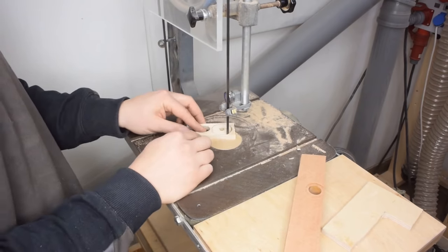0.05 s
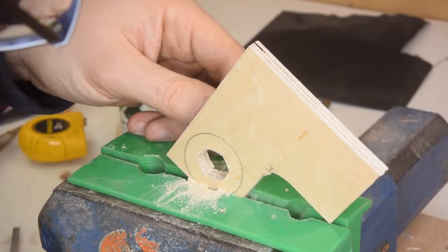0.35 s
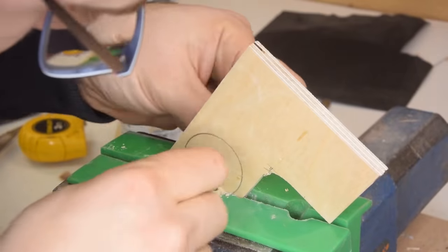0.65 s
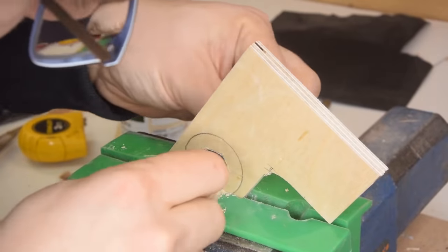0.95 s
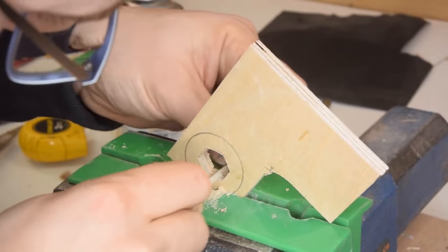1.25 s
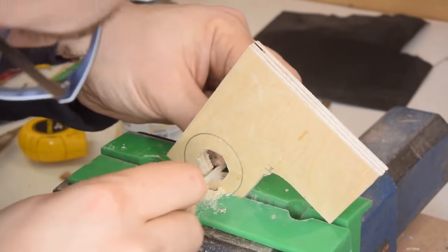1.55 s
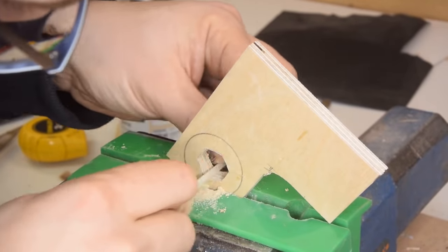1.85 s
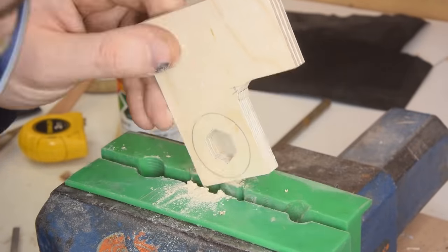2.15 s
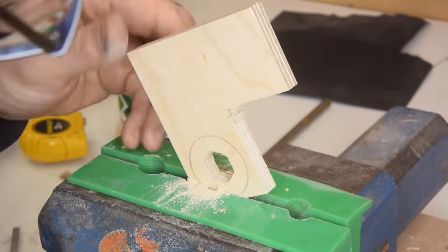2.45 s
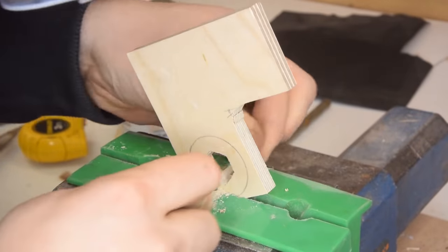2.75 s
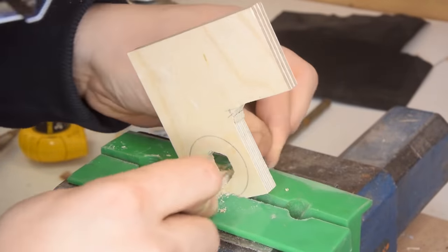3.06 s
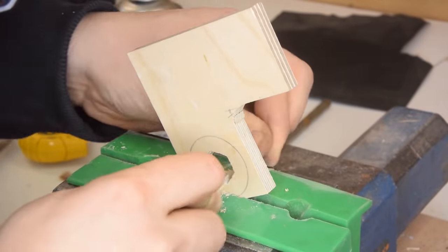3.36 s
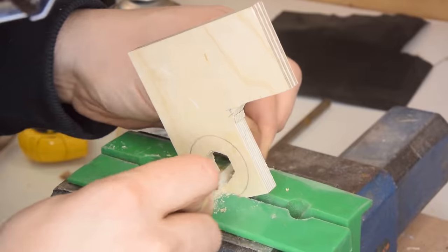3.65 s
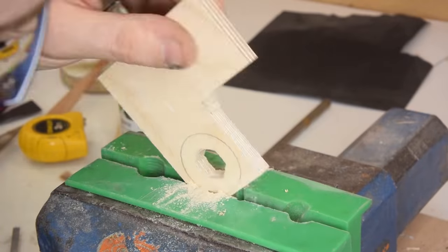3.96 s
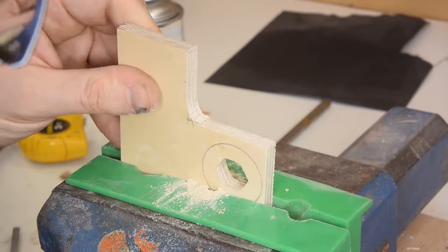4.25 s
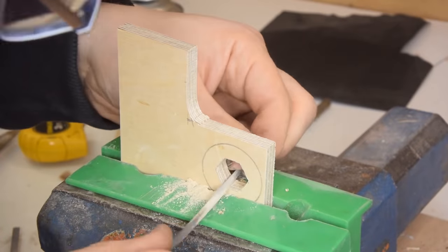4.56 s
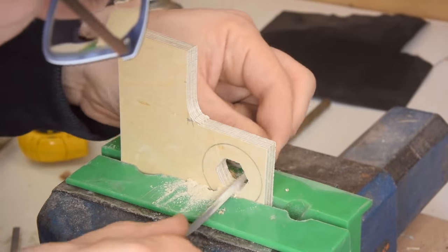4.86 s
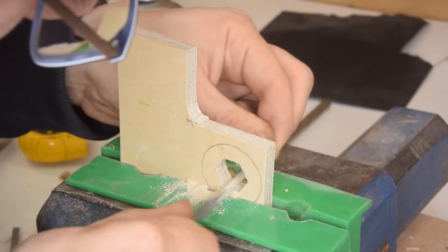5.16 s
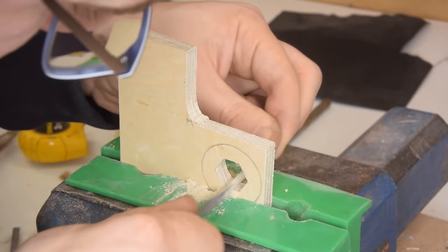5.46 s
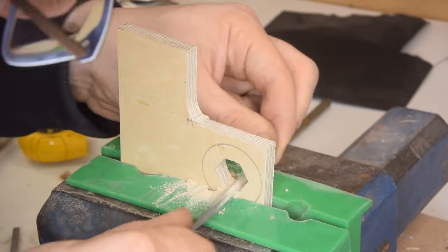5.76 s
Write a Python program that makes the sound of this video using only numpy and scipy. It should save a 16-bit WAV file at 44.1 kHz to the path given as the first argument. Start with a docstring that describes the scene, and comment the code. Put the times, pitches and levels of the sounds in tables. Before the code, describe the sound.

A bandsaw cuts plywood with a bright, gritty buzz and three tiny squeals, breaking off within half a second. Much more quietly, a small file rasps to and fro in the wood, so fast that it sounds sped up. The filing comes in three bursts, separated by woody knocks and faint hand rustles as the piece is turned and clamped in a vise. It all sounds close, over faint workshop hiss.

```python
"""Bandsaw cut, then filing at a vise.

A bandsaw cuts plywood; three times the blade slips in the kerf, squeals and sprays chips. Abrupt stop.
Then, in fast motion, a small file rasps evenly to and fro in a hole of the piece, held in a vise.
Twice the piece is turned and reclamped with woody knocks; each grip makes it ring at other pitches."""
import sys
import numpy as np
from scipy import signal
from scipy.fft import rfft, irfft
from scipy.io import wavfile

SR = 44100
rng = np.random.default_rng(int(sys.argv[2]) if len(sys.argv) > 2 else 0)


def generate_wav(sig):
    """Save sig (samples, or channels by samples) to the path in sys.argv[1] as 16-bit PCM at SR."""
    pcm = np.round(np.clip(np.atleast_2d(sig).T, -1, 1) * 32767).astype(np.int16)
    wavfile.write(sys.argv[1], SR, pcm)


N = 260631
TIME = np.arange(N) / SR

# saw teeth in wood: f/Hz, density/dB
CUT_SPECTRUM = [(60, -30), (240, -42), (450, -20), (850, -19), (1200, -8.5), (1750, -3), (2350, -11),
                (2700, -1), (6200, -3), (8000, -13), (16000, -35)]
# blade and guide resonances: f/Hz, width/Hz, boost/dB
SAW_MODES = [(2680, 265, 5.5), (3400, 67, 9.5), (4480, 90, -19.5), (5780, 257, 6.5), (7350, 150, 12.5),
             (10460, 320, 17.5)]
# chip spray: f/Hz, density/dB
CHIP_SPECTRUM = [(300, -36.5), (2000, -13.5), (5000, 4.5), (9000, 8.5), (12000, 6), (13200, 5.5),
                 (16000, 5)]
# drive hum: harmonic, level/dB
HUM_PARTIALS = [(3, -96.5), (4, -82.5), (5, -79), (6, -76), (7, -85), (8, -90), (9, -84.5), (10, -88.5),
                (12, -73.5), (14, -87), (16, -71), (17, -77)]
# running blade: f/Hz, relative level/dB, share of swell followed
BLADE_TONES = [(1771, -69, .2), (2186, -71, .2), (2693, -63, .6), (2966, -53, .4), (3319, -60, .8),
               (3459, -63, .6), (4203, -66, .3), (4474, -61, .1), (4888, -64, .4), (5583, -55, 1),
               (5716, -61, 1), (5947, -66, .6), (6634, -68, .3)]
# blade slips: t/s, load loss/dB, squeal/dB, chips/dB, decay/s
SLIPS = [(0.045, 11, -39.5, -46, 0.019), (0.113, 10, -43.5, -47.5, 0.037), (0.251, 8, -44, -42.5, 0.026)]
# slipping blade: harmonic, relative level/dB
SQUEAL_PARTIALS = [(1, -3), (2, -2.5), (3, 1)]
# pinched blade: harmonic, level/dB
WHISTLE_PARTIALS = [(1, -46.5), (2, -45.5), (3, -59.5)]
# stereo width of the saw: f/Hz, side over mid/dB
SAW_SIDE = [(2900, -61.5), (3500, -54.5), (4200, -15.5), (8000, -10.5), (15000, -5)]

# file teeth on wood: f/Hz, density/dB
RASP_SPECTRUM = [(30, -15.5), (120, -17.5), (168, 2.5), (225, -4.5), (420, 3.5), (1000, 1.5), (2000, 0.5),
                 (4000, -4), (6500, -5), (8800, -7), (9500, -14), (9950, -31), (10900, -22), (11600, -60)]
# resonances of the piece in each grip: f/Hz, width/Hz, boost/dB
GRIP_LEANING = [(1698, 140, 20), (2290, 600, 8), (3720, 450, 11.5), (5050, 360, 14), (7450, 485, 15)]
GRIP_TILTED = [(1577, 138, 17.6), (2654, 83, 20.7), (3070, 450, 11.2), (3760, 360, 13.2), (5320, 470, 7.7),
               (7660, 160, 10.8)]
GRIP_UPRIGHT = [(1120, 195, 8.5), (2187, 66, 20.7), (2480, 210, 11), (4350, 300, 8.4), (7700, 1000, 3)]
GRIP_SHIFTED = [(1130, 210, 7.8), (2185, 64, 19.2), (2490, 150, 9.1), (4420, 170, 15.9), (7600, 550, 5)]
# stroke runs: start/s, end/s, cycle rate/Hz, pressure/dB, drift/(dB/s), easing at ends/dB,
# pull over push/dB, pull cutoff/Hz, grip
FILE_RUNS = [(0.667, 1.387, 19.33, -53, 2, 5.5, -1, 5100, GRIP_LEANING),
             (1.387, 1.975, 19.56, -52.6, 1, 0.5, -1, 5100, GRIP_LEANING),
             (2.757, 3.757, 19.6, -52.7, -2.6, 0.3, -2, 9050, GRIP_TILTED),
             (4.654, 4.791, 18.1, -56.8, -4, 0.6, -1.5, 9000, GRIP_UPRIGHT),
             (4.894, 5.298, 19.66, -55.8, -7, 2.5, -1, 13900, GRIP_UPRIGHT),
             (5.298, 5.93, 19.83, -58.8, 0.8, 3.5, 2, 13000, GRIP_SHIFTED)]
# resonances of the hole's rim: f/Hz, width/Hz, boost/dB
RIM_MODES = [(1960, 630, 13.5), (4100, 1600, 12.5), (7400, 750, 10.5)]
# single scrapes: centre t/s, length/s, level/dB
SCRAPES = [(0.623, 0.028, -74), (0.665, 0.016, -56.5), (2.005, 0.017, -50.5), (2.426, 0.028, -56.5),
           (2.563, 0.017, -67), (2.717, 0.038, -71), (2.769, 0.024, -54.5), (3.774, 0.03, -65),
           (3.793, 0.034, -59), (3.847, 0.05, -51.5), (4.805, 0.037, -70), (4.88, 0.016, -66)]

# knocks of wood, file and vise: t/s, relative level/dB, low cut/Hz, high cut/Hz, chatter/s, note/Hz
KNOCKS = [(0.534, -70.5, 910, 2520, 0.0042, 1690), (0.751, -56, 295, 970, 0.0071, 755),
          (1.318, -54, 300, 1000, 0.0055, 800), (1.722, -55, 300, 1000, 0.0031, 1000),
          (1.986, -52.5, 500, 1000, 0.0041, 880), (2.125, -72, 150, 500, .003, 259),
          (2.293, -54, 450, 3000, 0.0034, 2140), (2.399, -39.5, 260, 685, 0.007, 593),
          (2.417, -39, 220, 850, 0.0075, 620), (2.461, -35, 240, 2920, 0.011, 1383),
          (2.630, -64.5, 1210, 2500, 0.0034, 1790), (3.655, -51, 508, 1120, 0.0061, 894),
          (4.086, -51.5, 300, 3030, 0.0031, 1050), (4.140, -55, 305, 2020, 0.0065, 740),
          (4.242, -42.5, 537, 850, 0.0047, 870), (4.254, -44.5, 200, 750, 0.0044, 560),
          (4.301, -41.5, 60, 1640, 0.0051, 1333), (4.310, -41, 130, 2700, 0.0052, 1100),
          (4.348, -57, 297, 895, 0.007, 625), (5.535, -53.5, 400, 1160, 0.012, 1050)]
# vise on its bench: f/Hz, width/Hz, boost/dB
VISE_MODES = [(156.6, 26, 16), (275, 120, 1.5), (432, 58, -3), (598, 62, 5), (822, 31, 8), (1030, 70, 3.5),
              (1300, 270, -5), (2110, 89, 6), (4900, 44, 9.5)]
# thud under the vise modes: f/Hz, density/dB
THUD_SPECTRUM = [(30, -27), (100, -5), (200, 8), (500, 11.5), (1500, 10.5), (3000, 7), (5000, 3.5),
                 (8000, 6.5), (9400, -33), (10200, -23)]
# hands and sleeves turning the piece: centre t/s, length/s, level/dB
RUSTLES = [(2.194, 0.16, -71), (4.009, 0.24, -67.5)]
# shop hiss: f/Hz, density/dB
HISS_SPECTRUM = [(20, -4.5), (120, -1.5), (500, 1.5), (1500, -2.5), (4500, -6), (6000, -9), (8000, -11.5),
                 (9400, -18), (10000, -51)]

SAW_END_S, HUM_HZ = 0.421, 81.9
CUT_DB, CHIPS_DB = -40.5, -46.5
SLIP_RISE_S, SLACK_S, STUTTER_DEPTH = 0.0038, 0.027, 0.41
SING_DB_PER_DB, BLADE_WAVER_RATIO = 2, 0.003
SQUEAL_HZ, WHISTLE_HZ = 4435, 5135
CATCH_SLOW_DB, CATCH_FAST_DB = 0.8, 1.2
ECHO_DECAY_S, CONTACT_SHIFT_RATIO = 0.0065, 0.03
BUMPS_PER_S, BUMP_REL_DB, BUMP_CHATTER_S = 2.5, -9.5, 0.00589
KNOCK_TRIM_DB, NOTE_WIDTH_HZ, NOTE_BOOST_DB = -15, 56, 11
HISS_DB, HUSH_DB, HISS_FULL_S, HISS_FADE_S = -72.5, -11.5, 0.726, 0.13
RUSTLE_CUTOFF_HZ, BAND_LIMIT_HZ = 6100, 15850


def bandsaw():
    """Central saw with wide treble, cut off abruptly."""
    t = TIME[TIME < SAW_END_S]
    mid, side = saw_voice(t), through(saw_voice(t), body(SAW_SIDE))
    return np.pad(np.array([mid + side, mid - side]), [(0, 0), (0, N - len(t))])


def saw_voice(t):
    """One channel: teeth, chips, drive, blade, kerf friction."""
    load_db = blade_load_db(t)
    return cutting(t, load_db) + chip_spray(t) + drive_hum(t) + blade_song(t, load_db) + kerf_rub(t)


def blade_load_db(t):
    """Load sags after each slip, lowest at SLACK_S, and rebuilds as the wood is fed on."""
    load_db = np.zeros(len(t))
    for at_s, loss_db, *_ in SLIPS:
        age = np.maximum(t - at_s, 0) / SLACK_S
        load_db -= loss_db * (age * np.exp(1 - age)) ** 2
    return load_db


def cutting(t, load_db):
    """Teeth tear fibres and ring blade and guides, throbbing at the drive rate."""
    throb = 1 + 0.083 * np.sin(2 * np.pi * HUM_HZ * t)
    tearing = throb * grit(len(t), per_s=13000, spread_db=4)
    return amp(CUT_DB + load_db) * unit(through(tearing, body(CUT_SPECTRUM, SAW_MODES)))


def chip_spray(t):
    """Steady spray of chips plus a burst per slip."""
    spray = amp(CHIPS_DB) + sum(amp(db) * slip_burst(t, at_s, fade_s) for at_s, _, _, db, fade_s in SLIPS)
    flicker = amp(0.44 * wander(len(t), 60))
    chips = grit(len(t), per_s=14000, spread_db=4)
    return spray * flicker * unit(through(chips, body(CHIP_SPECTRUM)))


def kerf_rub(t):
    """The pinched blade whistles until the first slip; every slip squeals."""
    slipping = sum(amp(db) * slip_burst(t, at_s, fade_s) for at_s, _, db, _, fade_s in SLIPS)
    pinched = np.clip(1 - (t - SLIPS[0][0]) / SLIP_RISE_S, 0, 1)
    squeal = harmonics(t, SQUEAL_HZ, SQUEAL_PARTIALS, waver_hz=100, speed_hz=630)
    whistle = harmonics(t, WHISTLE_HZ, WHISTLE_PARTIALS, waver_hz=44.3, speed_hz=630)
    return slipping * squeal + pinched * whistle


def slip_burst(t, at_s, fade_s):
    """Slip envelope: fast rise, decay stuttering at the drive rate."""
    age_s = np.maximum(t - at_s, 0)
    stutter = 1 + STUTTER_DEPTH * np.cos(2 * np.pi * HUM_HZ * (age_s - SLIP_RISE_S))
    return np.minimum(age_s / SLIP_RISE_S, 1) * np.exp(-age_s / fade_s) * stutter


def blade_song(t, load_db):
    """Tones of the running blade swell with the load."""
    swell_db = SING_DB_PER_DB * (load_db - load_db.mean())
    return sum(amp(db + 1.25 + share * swell_db) * tone(t, hz, hz * BLADE_WAVER_RATIO, speed_hz=90)
               for hz, db, share in BLADE_TONES)


def drive_hum(t):
    """Near-steady harmonics of the drive."""
    return harmonics(t, HUM_HZ, HUM_PARTIALS, waver_hz=0.16, speed_hz=17)


def filing(start_s, end_s, rate_hz, pressure_db, drift_db_per_s, ease_db, pull_db, pull_hz, grip):
    """Teeth bite on the push, drag duller on the pull, and ring the piece."""
    t = np.arange(0, end_s - start_s, 1 / SR)
    speed = np.sin(2 * np.pi * rate_hz * t)
    sweep = 0.12 + speed ** 2
    bearing_db = pressure_db - ease_db * np.linspace(-1, 1, len(t)) ** 2 + drift_db_per_s * (t - t.mean())
    catching_db = CATCH_SLOW_DB * wander(len(t), 32) + CATCH_FAST_DB * wander(len(t), 220)
    force = unit(sweep * amp(catching_db) * signal.windows.tukey(len(t), 0.008)) * amp(bearing_db)
    push, pull = force * (speed > 0), force * (speed <= 0)
    strokes = np.array([teeth(push) + amp(pull_db) * lowpass(teeth(pull), pull_hz) for _ in range(2)])
    # the moving contact crossfades between lowered and raised modes
    spot = np.pi / 4 * (1 + np.tanh(2 * wander(strokes.shape[1], 20)))
    low = body(RASP_SPECTRUM, np.array(grip) * [1 - CONTACT_SHIFT_RATIO, 1, 1])
    high = body(RASP_SPECTRUM, np.array(grip) * [1 + CONTACT_SHIFT_RATIO, 1, 1])
    return start_s, ring(strokes * np.cos(spot) ** 2, low) + ring(strokes * np.sin(spot) ** 2, high)


def teeth(force):
    """File grit under a force curve; bench reflections add a short tail."""
    energy = np.pad(force ** 2, (0, 3000))
    pole = np.exp(-1 / (ECHO_DECAY_S * SR))
    echo = np.sqrt(signal.lfilter([1 - pole], [1, -pole], energy))
    direct = np.sqrt(energy) * grit(len(energy), per_s=9000, spread_db=0)
    return direct + 0.66 * echo * rng.standard_normal(len(energy))


def scrape(centre_s, length_s, db):
    """One drag of the file along the rim."""
    force = amp(db) * np.hanning(round(length_s * SR))
    return centre_s - length_s / 2, ring([teeth(force), teeth(force)], body(RASP_SPECTRUM, RIM_MODES))


def rim_bumps(start_s, end_s, rate_hz, pressure_db):
    """The file taps the rim in the middle of random strokes."""
    midstrokes_s = np.arange(start_s + 1 / rate_hz / 4, end_s, 1 / rate_hz / 2)
    hits_s = midstrokes_s[rng.random(len(midstrokes_s)) < BUMPS_PER_S / (2 * rate_hz)]
    return [knock(at_s - BUMP_CHATTER_S, pressure_db + BUMP_REL_DB, low_hz=348, high_hz=1060,
                  chatter_s=BUMP_CHATTER_S, note_hz=804) for at_s in hits_s]


def knock(at_s, db, low_hz, high_hz, chatter_s, note_hz):
    """A chattering blow rings vise and piece; soft contact is dull, light contact lacks bass."""
    t = TIME[:8192]
    rise = 1 - np.exp(-t / (1.6 * chatter_s))
    decay = np.exp(-t / chatter_s) + 0.15 * np.exp(-t / 0.02)
    contact = unit(rise * decay) * rng.standard_normal((2, len(t)))
    modes = [*VISE_MODES, (note_hz, NOTE_WIDTH_HZ, NOTE_BOOST_DB)]
    response = lowpass(body(THUD_SPECTRUM, modes), high_hz, order=2)
    response = signal.lfilter(*signal.butter(2, low_hz, "high", fs=SR), response)
    return at_s, amp(db + KNOCK_TRIM_DB) * ring(contact, response)


def rustle(centre_s, length_s, db):
    """A hand brushes the piece: a soft noise swell."""
    swell = amp(db) * np.hanning(round(length_s * SR))
    response = lowpass(body(HISS_SPECTRUM), RUSTLE_CUTOFF_HZ)
    return centre_s - length_s / 2, ring(swell * rng.standard_normal((2, len(swell))), response)


def shop_hiss():
    """Diffuse shop noise, fading in after the saw."""
    hush = np.clip((HISS_FULL_S - TIME) / HISS_FADE_S, 0, 1)
    level = amp(HISS_DB + HUSH_DB * hush + wander(N, 49)) * (TIME > SAW_END_S)
    return level * ring(rng.standard_normal((2, N)), body(HISS_SPECTRUM))


def amp(db):
    """dB to gain."""
    return 10 ** (np.asarray(db) / 20)


def unit(x):
    """Scale to rms 1."""
    return x / np.sqrt(np.mean(x ** 2) + 1e-30)


def wander(size, speed_hz):
    """Random drift up to about speed_hz, rms 1."""
    hz = np.fft.rfftfreq(size, 1 / SR)
    return unit(irfft(rfft(rng.standard_normal(size)) * np.exp(-(hz / speed_hz) ** 2), size))


def grit(size, per_s, spread_db):
    """Snapping fibres: random uneven clicks, rms 1."""
    sign = np.sign(rng.standard_normal(size))
    snaps = rng.random(size) < per_s / SR
    height_db = spread_db * np.minimum(rng.exponential(1, size), 4)
    return unit(sign * snaps * amp(height_db))


def tone(t, hz, waver_hz, speed_hz):
    """Sine of wavering pitch, rms 1."""
    turns = np.cumsum(hz + waver_hz * wander(len(t), speed_hz)) / SR + rng.random()
    return np.sqrt(2) * np.sin(2 * np.pi * turns)


def harmonics(t, hz, partials, waver_hz, speed_hz):
    """Independently wavering multiples of hz."""
    return sum(amp(db) * tone(t, k * hz, k * waver_hz, speed_hz) for k, db in partials)


def body(spectrum, modes=(), size=4096):
    """Minimum-phase impulse response of a broad spectrum with resonances on top."""
    hz = np.fft.rfftfreq(size, 1 / SR)
    points_hz, points_db = np.transpose(spectrum)
    broad_db = np.interp(np.log(hz + 1), np.log(points_hz + 1), points_db)
    power = 1 + sum(amp(db) ** 2 / (1 + ((hz - mode_hz) / width_hz) ** 2) ** 2
                    for mode_hz, width_hz, db in modes)
    log_gain = np.log(amp(broad_db) * np.sqrt(power))
    mirrored = np.concatenate([log_gain, log_gain[-2:0:-1]])
    return np.fft.ifft(np.exp(np.conj(signal.hilbert(mirrored)))).real


def lowpass(x, hz, order=1):
    """Low-pass, cutoff capped at SR / 3."""
    return signal.lfilter(*signal.butter(order, min(hz, SR / 3), fs=SR), x)


def through(x, response):
    """Convolve, keeping the length."""
    return signal.fftconvolve(x, response)[:len(x)]


def ring(channels, response):
    """Each channel excites a unit-energy response."""
    return np.array([through(x, response / np.linalg.norm(response)) for x in channels])


def add(mix, at_s, sound):
    """Mix in a stereo sound."""
    part = mix[:, round(at_s * SR):][:, :sound.shape[1]]
    part += sound[:, :part.shape[1]]


def scene():
    """Saw, then work at the vise over shop hiss."""
    mix = bandsaw() + shop_hiss()
    for source, rows in (filing, FILE_RUNS), (scrape, SCRAPES), (knock, KNOCKS), (rustle, RUSTLES):
        for row in rows:
            add(mix, *source(*row))
    for run in FILE_RUNS:
        for bump in rim_bumps(*run[:4]):
            add(mix, *bump)
    return mix


def record(dry):
    """Steep treble limit."""
    taps = signal.firwin(511, BAND_LIMIT_HZ, window=("kaiser", 9), fs=SR)
    return signal.oaconvolve(dry, taps[None], "same")


dry = scene()
out = record(dry)
generate_wav(out)
```